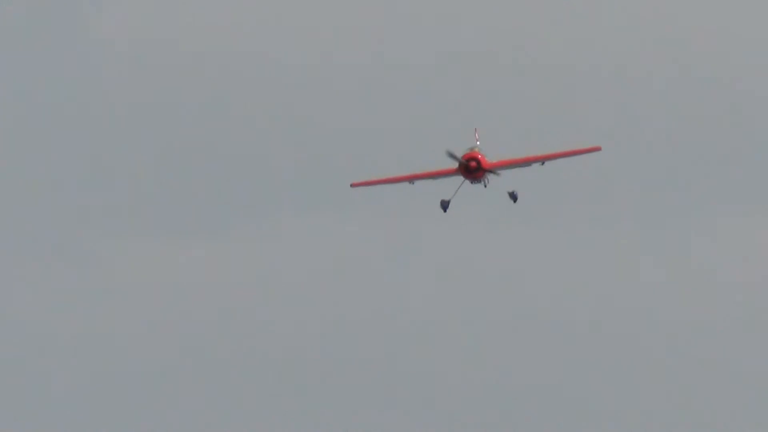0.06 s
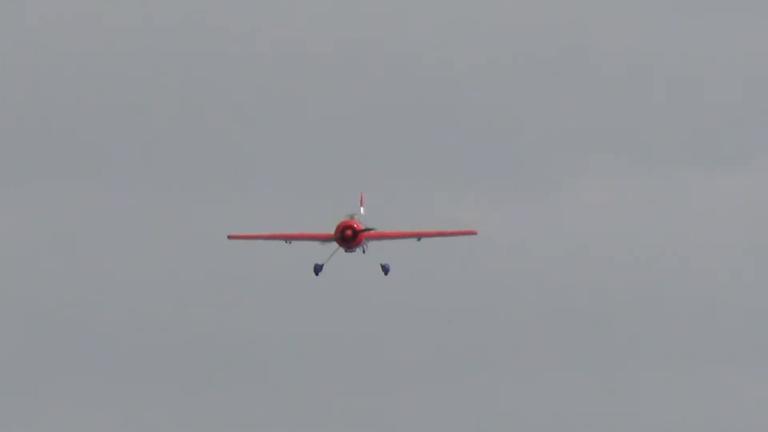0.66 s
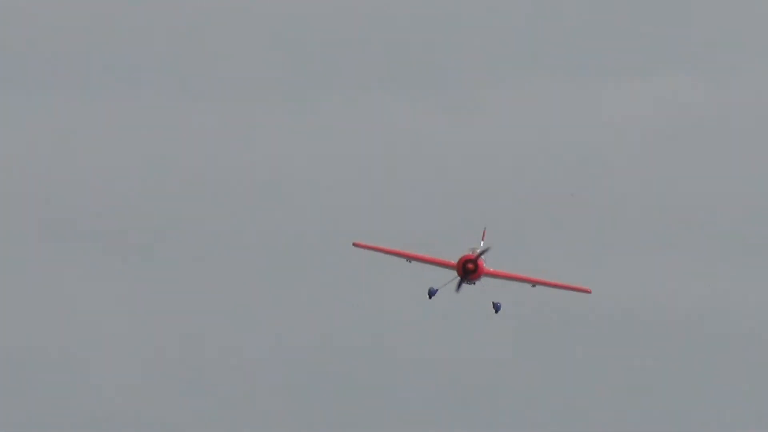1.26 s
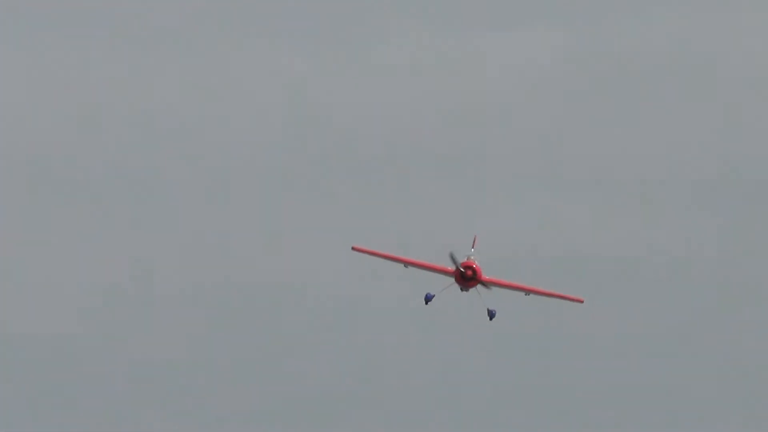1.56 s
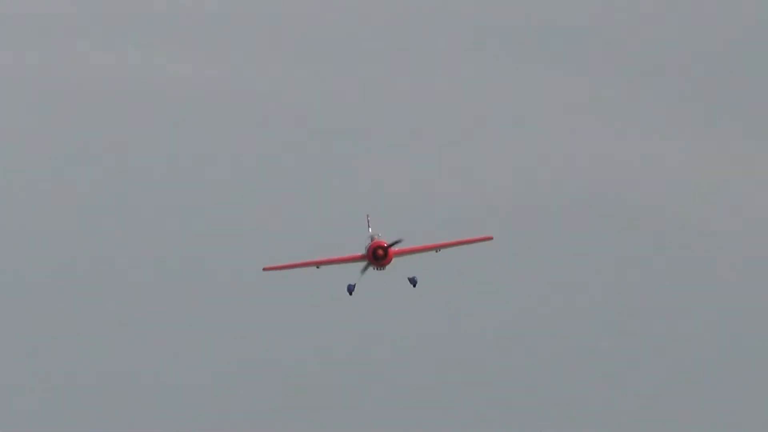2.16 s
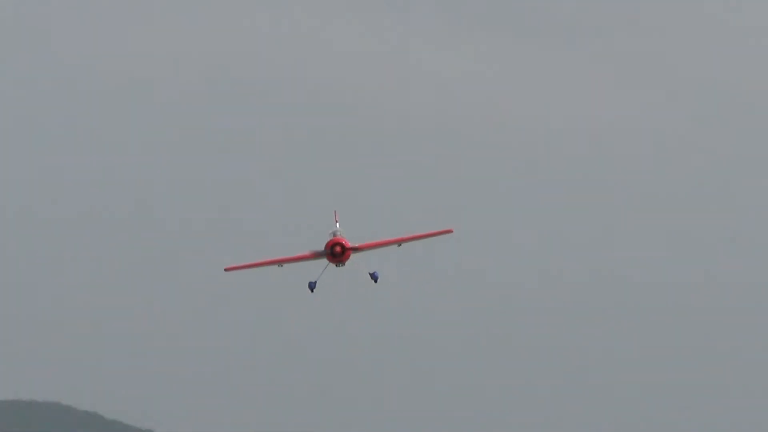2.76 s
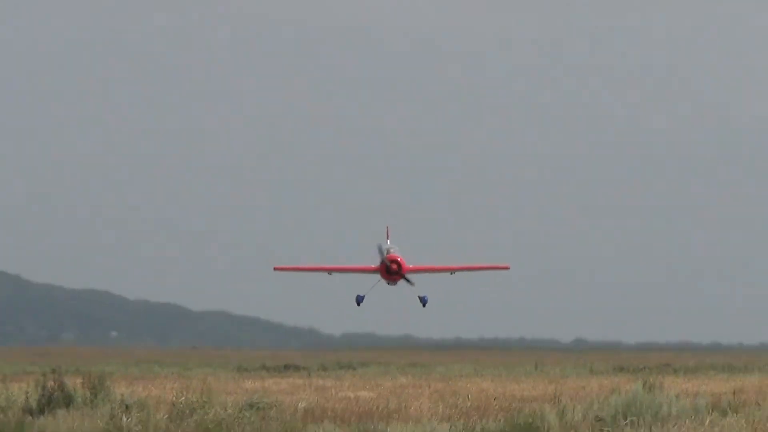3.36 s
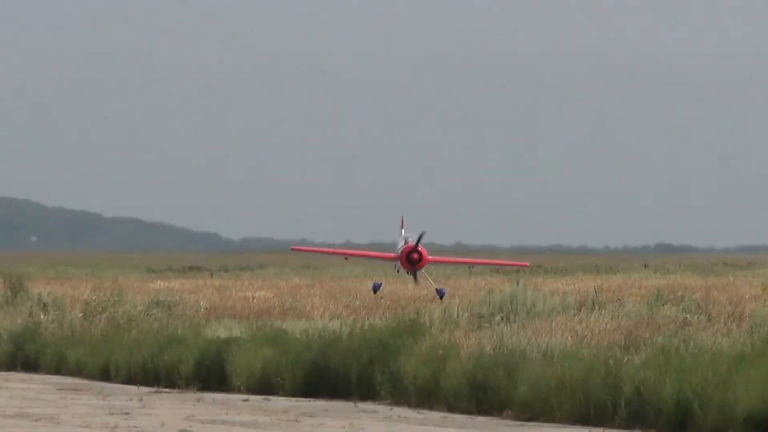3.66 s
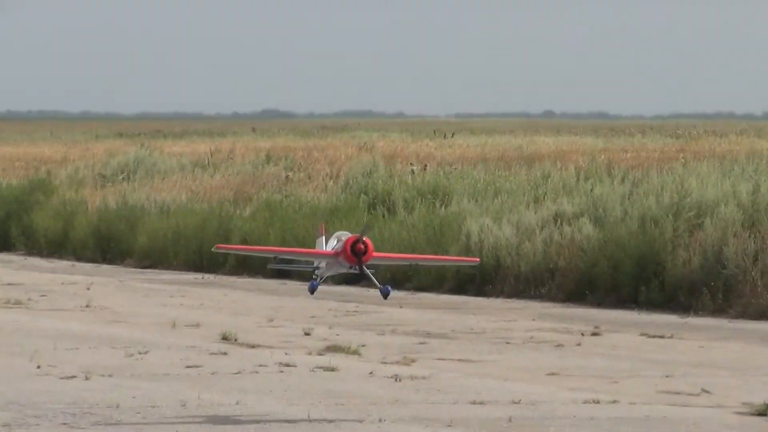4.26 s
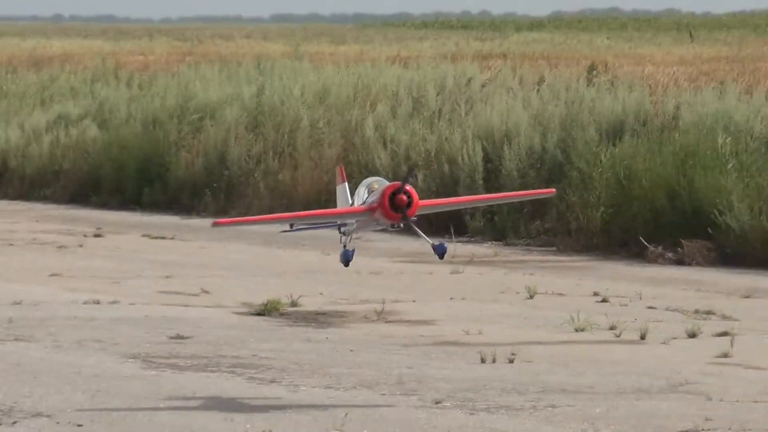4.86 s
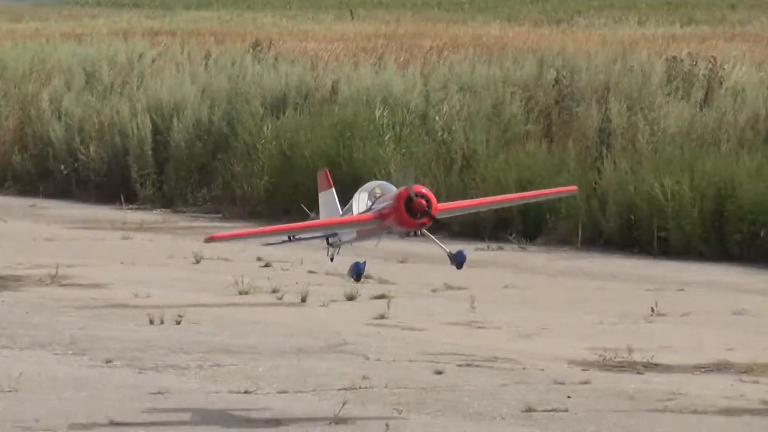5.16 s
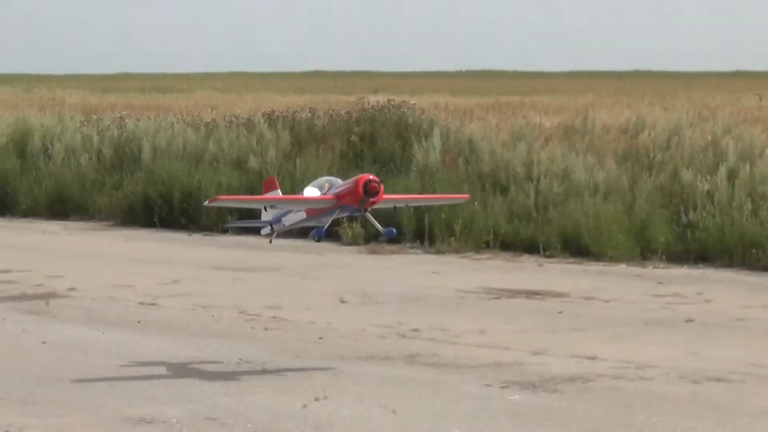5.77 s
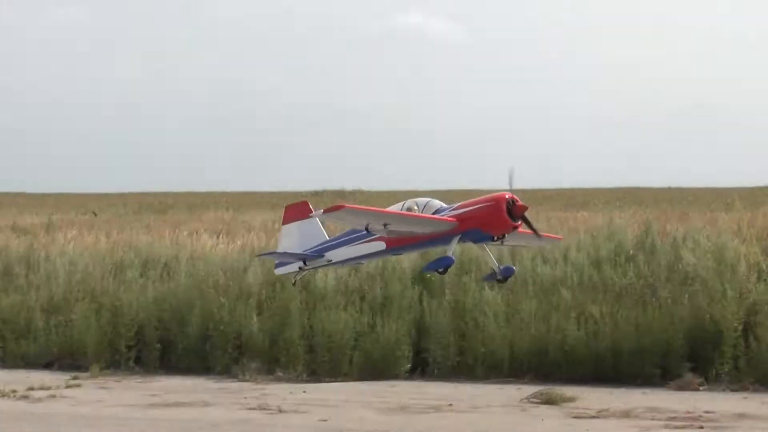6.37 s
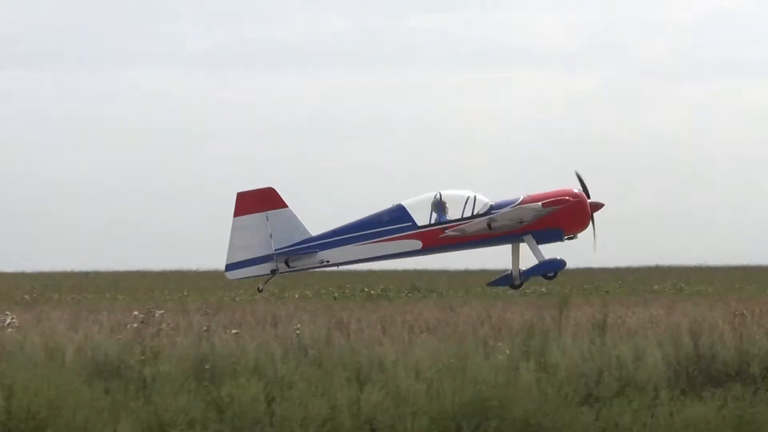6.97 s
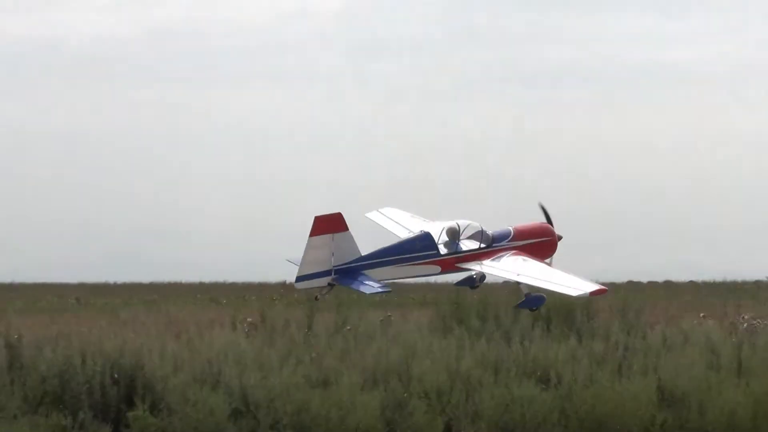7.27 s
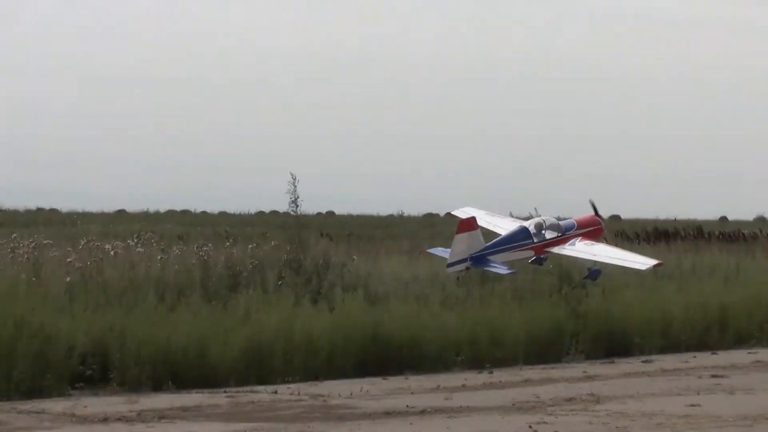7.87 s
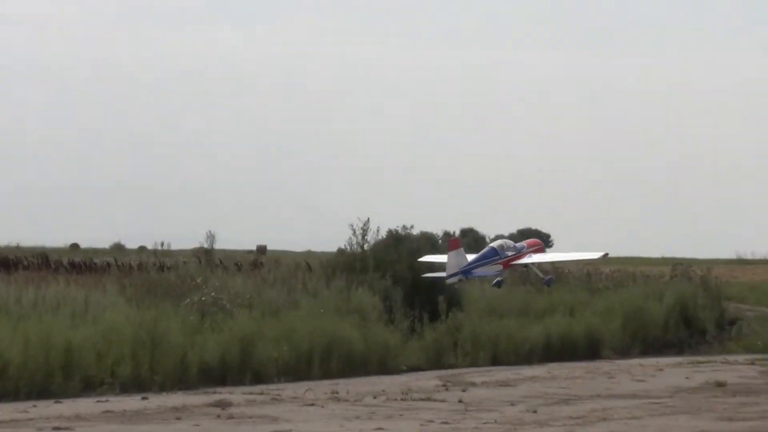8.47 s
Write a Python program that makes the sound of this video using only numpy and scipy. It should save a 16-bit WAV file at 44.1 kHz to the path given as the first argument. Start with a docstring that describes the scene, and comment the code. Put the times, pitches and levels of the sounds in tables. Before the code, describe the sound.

Outdoors in an open field, a small model plane approaches with a sputtering, irregular putter and a swishing propeller. The engine gets fuller and louder and makes a low pass near the microphone, with a phasing sweep in its tone. Just after, two brief gusts buffet the microphone as the engine revs up, rising in pitch to a hard, even buzz while heading away.

```python
"""A far-off two-stroke sputters at idle while light wind bumps the microphone: a model aeroplane
glides in, passes low over a runway and opens up again. Each turn of the shaft blows a pulse through
the silencer, which booms, rings and barks; at idle it often fires only every second turn.
The propeller hisses and the piston rattles. The ground returns a late copy that sweeps a comb
through the sound, and a gain control ducks the loudest peaks."""
import sys
import numpy as np
from scipy import signal
from scipy.fft import rfft, irfft, next_fast_len
from scipy.io import wavfile
from scipy.ndimage import uniform_filter1d

SR = 44100
rng = np.random.default_rng(int(sys.argv[2]) if len(sys.argv) > 2 else 0)


def dump(signal):
    """Clip the signal to [-1, 1] and save it as 16-bit WAV at the path in sys.argv[1]."""
    limited = np.clip(np.atleast_2d(signal).T, -1, 1)
    pcm = np.round(limited * 32767).astype(np.int16)
    wavfile.write(sys.argv[1], SR, pcm)


N = 380141
TIME = np.arange(N) / SR

# noise colours: f/Hz, relative level/dB
FIELD_COLOUR = [(25, -31), (60, -42), (110, -8), (200, -4), (400, -0.5), (1000, 3), (1800, -2.5),
                (3000, -7.5), (6000, -12), (12000, -26), (16000, -18)]
BUFFET_COLOUR = [(25, -61), (70, -28), (130, -8.5), (210, -4), (330, -8), (500, -10.5), (900, -42),
                 (2500, -67)]
PROPELLER_COLOUR = [(100, -45), (200, -9), (330, -3), (550, 2), (1000, .5), (2000, -4), (3000, -7.5),
                    (4500, -8.5), (5800, -7), (6900, -4), (7900, 1.5), (9000, -3.5), (11000, -13),
                    (13000, -26), (16000, -30)]
GAS_COLOUR = [(700, -40), (1500, -4), (2200, -1), (3050, -9), (4000, 3), (4900, 1.5), (5800, -6),
              (7900, 8.5), (10000, -3), (13000, -12), (16000, -31)]
# the strongest eddies on the microphone: t/s, buffet/dB, rumble/dB, bell half-width/s
EDDIES = [(0.163, -51.5, -64, 0.06), (0.492, -54, -63, 0.021), (0.635, -52, -72, .015),
          (0.766, -48, -70, 0.017), (0.864, -41.5, -72, 0.015), (0.972, -49, -77, 0.021),
          (1.031, -36.5, -70, 0.0096), (1.18, -45, -70, 0.029), (1.632, -49, -62, 0.0075),
          (4.19, -45, -58, 0.027), (7.46, -18, -45, 0.041), (7.905, -4.5, -65.5, 0.013)]
# tone of the left microphone against the right: f/Hz, level/dB
LEFT_TILT = [(30, 0), (70, -2), (150, -2.9), (260, -2.9), (380, -1.6), (520, -.1), (1500, -.3), (4000, .2),
             (16000, 0)]
# phase lead of the left microphone: f/Hz, phase/rad
LEFT_LEAD = [(0, 0), (15700, 0.095)]
# ground echo: t/s, effective height/m (sets its delay and sweeping comb), nominal reflected share
GROUND_BOUNCE = [(0, 1.3, .5), (.5, 1.55, .6), (.9, 1.95, 0.5), (1.2, 2.7, 0.25), (2.6, 2.05, 0.46),
                 (3.5, 0.63, 0.068), (4.4, 0.25, 0.5), (4.9, 0.37, 0.45), (5.45, 0.74, 0.6),
                 (5.75, .9, 0.6), (5.9, .99, .65), (6.17, 1.31, 0.8), (6.5, 1.64, 0.75),
                 (6.88, 1.685, 0.75), (7.2, 1.66, .75), (7.45, 1.5, 0.75), (7.7, 1.37, .62),
                 (8.05, 1.29, 0.62), (8.62, 1.36, 0.55)]
# treble rides on hiss and rattle: t/s, 2.4-5 kHz gain/dB, 5-7.2 kHz gain/dB, gain above 7.2 kHz/dB
TREBLE_RIDES = [(0, 14, -19, -3), (.2, 13, -5, 0), (.45, 7, -2, 4.5), (.8, -7, 7, 1), (1.05, 10, 2, -9),
                (1.25, 10.5, 9, 0), (1.5, 6.5, -6, -9), (1.7, 7, -8, -3), (1.85, 8, -10, -8),
                (2.1, 7.5, 3.5, -3), (2.8, 1.5, -5.5, -10), (3.1, 8, 2.5, -8.5), (3.33, 5.5, -13, -4),
                (3.48, -5, -38, -10), (3.7, -2, -2.5, -10.5), (4.4, 2, -4, -9.5), (5.2, 3, 2.5, 1.5)]
# tone by direction: angle off the nose/deg, boom/dB, bark/dB, cowl/dB, propeller hiss/dB
DIRECTIVITY = [(5.96, -10, -8, -2.5, -9), (8.6, -21.5, -10.5, -3, -1), (12.1, -12.5, -7.5, -8.5, 3),
               (12.4, -14, -3, -9.5, 6), (18.3, -13, -1.5, -12, 2), (24.3, -8.5, -5.5, -16.5, -1),
               (37.2, -8, -3.5, -12, 2.5), (54.5, -5, -4.5, -17, 4.5), (82.5, -0.5, -3.5, -52, -0.5),
               (128, -1, -2.5, -24.5, 3.5), (154.6, 0.5, -1.5, -10, 2.5), (161, -2, -0.5, -13, -14)]
# shaft turns per second as heard: t/s, f/Hz
SHAFT_SPEED = [(0.0, 54.64), (0.3, 54.51), (0.6, 53.6), (0.85, 54.65), (1.05, 52.18), (1.3, 52.7),
               (1.84, 51.7), (2.12, 46.92), (2.63, 51.73), (2.85, 51.18), (3.32, 50.33), (3.64, 51.95),
               (3.9, 46.51), (4.16, 50.84), (4.34, 46.64), (4.82, 49.83), (4.97, 59.77), (5.16, 50.72),
               (5.38, 61.77), (5.62, 57.95), (5.8, 58.09), (6.02, 58.29), (6.3, 60.49), (6.5, 56.81),
               (6.7, 57.34), (6.95, 54.36), (7.28, 55.07), (7.5, 57.84), (7.77, 72.16), (7.92, 74.6),
               (8.17, 78.66), (8.3, 85.46), (8.62, 96.23)]
# misfires on alternate turns, lone or in runs: start t/s, count, strength against a full firing/dB
MISFIRE_RUNS = [(.011, 3, -24), (.157, 2, -18), (.249, 2, -18), (.47, 1, -27), (.525, 1, -13),
                (.637, 1, -18), (.785, 1, -24), (.84, 4, -1), (1.256, 2, -10), (1.37, 2, -15),
                (1.484, 1, -15), (1.541, 1, -14), (1.677, 4, -18), (1.869, 2, -9), (2.219, 1, -24),
                (2.281, 1, -11), (2.405, 2, -17), (2.523, 6, -23), (2.913, 1, -3), (3.032, 1, -5),
                (3.07, 1, -27), (3.288, 4, -22), (3.525, 6, -35), (3.969, 7, -29), (4.336, 3, -8),
                (4.527, 9, -27), (4.96, 4, -6), (5.235, 8, -19), (5.523, 15, -38), (6.156, 4, -17),
                (6.324, 1, -8), (6.357, 3, -22), (6.458, 3, -34), (6.6, 12, -18.5), (7.029, 12, -21),
                (7.46, 2, -7)]
# accents on single firings: t/s, bark trim/dB, level trim/dB
POP_ACCENTS = [(.067, 4, 0.5), (.176, 3, 1), (.452, 9.5, 3), (.62, 5, 0), (.768, 11, 3.5), (.823, 9, 3.5),
               (1.2, 6, 4.5), (1.522, 6, 1), (1.657, 7, 1.5), (1.695, 5, 1.5), (1.733, 6, 3),
               (1.888, 1, 4.5), (2.198, 7, 0.5), (2.302, 0, 1), (2.543, 9.5, -3), (2.582, 8.5, -2),
               (3.658, -7, 5.5), (3.697, 0, 6), (4.111, -0.5, -1.5), (4.151, -1, 3.5), (5.011, -0.5, 0),
               (5.047, -6, 6), (5.122, -1.5, 7.5), (5.141, 3.5, 5), (6.407, -2.5, 2.5), (6.565, 3, 1.5),
               (7.228, -1.5, 1.5), (7.263, 1, 1.5)]
# resonances of the engine's metal casing: f/Hz, width/Hz, relative level/dB
CASING_MODES = [(3647, 90, -9), (4960, 140, -9), (6450, 140, -8), (7380, 150, -3), (7935, 150, 0),
                (8550, 220, -3)]
# resonances of the cowl, and of its side: f/Hz, width/Hz, relative level/dB
COWL_MODES = [(1205, 135, 0)]
FLANK_MODES = [(858, 46, 1), (935, 43, 2)]
# resonances of silencer and exhaust, low to high: f/Hz, width/Hz, relative level/dB
IDLE_BOOM_MODES = [(223, 42, -4), (320, 93, 2.5), (362, 41, 2.5)]
OPEN_BOOM_MODES = [(257, 103, 18.4), (423, 113, 20.1)]
RING_MODES = [(541.6, 103, 13.5), (620, 106, 12)]
BARK_MODES = [(1690, 144, -0.5), (1970, 245, 3), (2320, 380, -5)]
RASP_MODES = [(2590, 200, 11), (3230, 440, 10.5), (3860, 310, 9)]
TIN_MODES = [(3620, 330, -1), (4140, 310, 1.5), (4800, 100, -2)]

BREEZE_DB, BREEZE_ENDS_S, EDDY_DB = -60.5, 2.17, 5.5  # weak random eddies until the breeze drops
PASSES_S, SPEED_M_S, NEAREST_M, MIC_HEIGHT_M = 6.88, 13.76, 9.01, 1.503
# far off, the wind bends the sound away over the microphone
SHADOW_FROM_M, SHADOW_FULL_M, SHADOW_DB, SHADOW_HISS_DB = 49, 85.5, -14.5, -4
TOP_LIFT_DB_PER_M, TOP_LIFT_FROM_M = 0.03, 6.8
GROUND_LEAD_RAD = 0.19  # porous ground turns the phase of a steep bounce
HUB_M, HISS_MIRROR = .07, 0.54  # the propeller sits above the silencer; its wide disc blurs its bounce
# base levels at the nearest point at idle, and their rise with shaft speed
IDLE_HZ, EXHAUST_DB, HISS_DB, RATTLE_DB = 58.3, -6.5, -18.5, -23.5
EXHAUST_DB_PER_HZ, HISS_DB_PER_HZ, RATTLE_DB_PER_HZ = 0.9425, 0.9786, 0.66
EFFORT_HZ_PER_S, PULL_DB, COAST_DB = 23.4, 4.5, -4
FLANK_DB, RASP_DB, TIN_DB = -11, -9, -4  # layer trims
BOOM_SAG = 0.35  # share of a misfire's drop in dB that the boom follows
HEAT_SCATTER, MISFIRE_COOLING = 0.015, 0.013  # shares by which resonances wander, and sink on a misfire
LIMIT_DB, RELEASE_DB_PER_S, CEILING, TOP_HZ = -5, 8.5, .8, 15850


def amp(db):
    """Decibels to gain."""
    return 10 ** (np.asarray(db) / 20)


def curves(table, at):
    """A table's other columns, interpolated along its first."""
    axis, *columns = np.transpose(table)
    return [np.interp(at, axis, column) for column in columns]


def on_log_axis(points, hz):
    """A frequency curve read at hz, on a log axis."""
    f, values = np.transpose(points)
    return np.interp(np.log(hz + 1), np.log(f), values)


def noise(colour):
    """Noise of a given colour, rms 1."""
    size = next_fast_len(N)
    gain = amp(on_log_axis(colour, np.fft.rfftfreq(size, 1 / SR)))
    y = irfft(rfft(rng.standard_normal(size)) * gain, size)[:N]
    return y / y.std()


def drift(rate_hz):
    """A smooth random modulator, spread 1."""
    hold = int(SR / rate_hz)
    steps = np.repeat(rng.standard_normal(N // hold + 1), hold)
    y = uniform_filter1d(uniform_filter1d(steps, hold), hold)[:N]
    return y / y.std()


def resonate(x, modes, band_hz, order=2):
    """Damped modes between soft band edges; a unit click comes out with unit energy."""
    t = np.arange(2048) / SR
    ring = sum(amp(db) * np.sqrt(width) * np.exp(-np.pi * width * t) * np.cos(2 * np.pi * hz * t)
               for hz, width, db in modes)
    ring = signal.sosfilt(signal.butter(order, band_hz, "band", fs=SR, output="sos"), ring)
    return signal.oaconvolve(x, ring / np.linalg.norm(ring))[:N]


def clicks(times, sizes):
    """Clicks shared between neighbouring samples."""
    at = np.clip(times * SR, 0, N - 2)
    i = at.astype(int)
    return np.bincount(i, sizes * (1 - at + i), N) + np.bincount(i + 1, sizes * (at - i), N)


def puffs(times, sizes, rise_s, fall_s):
    """A quick attack and decay after each time, with peak 1 for size 1."""
    t = np.arange(2048) / SR
    shape = (1 - np.exp(-t / rise_s)) * np.exp(-t / fall_s)
    return signal.oaconvolve(clicks(times, sizes), shape / shape.max())[:N]


def gain_control(x):
    """Ducks fast for a peak over the limit and releases slowly."""
    over_db = 20 * np.log10(abs(x).max(axis=0) + 1e-9) - LIMIT_DB
    recovery = RELEASE_DB_PER_S * TIME
    cut_db = np.maximum(np.maximum.accumulate(over_db + recovery) - recovery, 0)
    return x * amp(-uniform_filter1d(cut_db, size=256))


def wind():
    """The bed: short eddies buffet the microphone ports over the soft rustle of the field."""
    swells = np.array([np.exp(-.5 * ((TIME - s) / width) ** 2) for s, _, _, width in EDDIES])
    _, buffet_db, thump_db, _ = np.transpose(EDDIES)
    fade = np.clip((BREEZE_ENDS_S - TIME) / 0.48, 0, 1)
    breeze = amp(BREEZE_DB + EDDY_DB * np.tanh(drift(30.8))) * fade
    ports = noise(BUFFET_COLOUR) + 0.24 * np.array([noise(BUFFET_COLOUR), noise(BUFFET_COLOUR)])
    field = noise(FIELD_COLOUR) + 0.21 * np.array([noise(FIELD_COLOUR), noise(FIELD_COLOUR)])
    # the deepest rumble is unrelated left and right, and grows while the microphones swing round
    rumble = np.array([noise([(25, -32), (70, 8), (130, 8), (400, -58)]) for _ in range(2)])
    rumble_db = np.interp(TIME, [3, 5.5, 7.3, 8.6], [-72, -76, -49, -61])
    buffet = (amp(buffet_db) @ swells + breeze) * ports
    return buffet + amp(-51) * field + (amp(rumble_db) + amp(thump_db) @ swells) * rumble


def flight(t):
    """A straight, steady pass: distance in m, degrees off the nose, depth in the wind shadow (0-1)."""
    ahead = SPEED_M_S * (PASSES_S - t)
    metres = np.hypot(ahead, NEAREST_M)
    shadow = np.clip((metres - SHADOW_FROM_M) / (SHADOW_FULL_M - SHADOW_FROM_M), 0, 1)
    return metres, np.degrees(np.arctan2(NEAREST_M, ahead)), shadow


def grass_scatter(x):
    """Tall grass scatters a faint, very short tail."""
    t = np.arange(SR // 4) / SR
    tail = rng.standard_normal(len(t)) * np.exp(-t / 0.0049) * (t > .004)
    tail = signal.sosfilt(signal.butter(1, [500, 3500], "band", fs=SR, output="sos"), tail)
    return amp(-25) * signal.oaconvolve(x, tail / np.linalg.norm(tail))[:N]


def over_ground(x, lift_m, near_bounce=1):
    """Direct sound plus its late bounce make a sweeping comb; near_bounce scales it at close range."""
    metres = flight(TIME)[0]
    effective_height_m, share = curves(GROUND_BOUNCE, TIME)
    delay_ms = 1000 * 2 * MIC_HEIGHT_M * (effective_height_m + lift_m) / metres / 343
    steep = np.clip(delay_ms / 0.4, 0, 1)
    # rough ground mirrors treble only at grazing angles
    dull_mix = np.clip(delay_ms / .6, 0, 1)
    dull = signal.sosfiltfilt(signal.butter(3, 5800, fs=SR, output="sos"), x)
    dull = np.real(signal.hilbert(dull, next_fast_len(N))[:N] * np.exp(1j * GROUND_LEAD_RAD))
    # tufts and hollows make the bounce flutter
    delay_ms = delay_ms * (1 + .012 * drift(20))
    closeness = np.clip(2 - metres / 35, 0, 1)
    share = share * amp(steep * drift(10)) * (1 + (near_bounce - 1) * closeness)
    bounce = np.interp(TIME - delay_ms / 1000, TIME, dull_mix * dull + (1 - dull_mix) * x)
    combed = (x + share * bounce) / (1 + 0.086 * share * (1 - steep))
    return combed + grass_scatter(combed)


def top_lift(x):
    """A gentle high shelf: the top octave gains a little with distance."""
    below = signal.sosfiltfilt(signal.butter(2, 9500, fs=SR, output="sos"), x)
    return below + (x - below) * amp(TOP_LIFT_DB_PER_M * (flight(TIME)[0] - TOP_LIFT_FROM_M))


def swish(x):
    """The hiss swishes: three treble bands swell and fade on set curves, with slight flutter far off."""
    far = np.clip((5.5 - TIME) / 3, 0, 1)
    out = 0
    for edge_hz, db in zip((2440, 5000, 7200, None), [0] + curves(TREBLE_RIDES, TIME)):
        band = signal.sosfiltfilt(signal.butter(5, edge_hz, fs=SR, output="sos"), x) if edge_hz else x
        out = out + band * amp(db + .9 * far * drift(8))
        x = x - band
    return out


def shaft():
    """The engine's clock: the shaft angle in turns, and the moments when the exhaust port opens."""
    turns = 5 / 12 + np.cumsum(curves(SHAFT_SPEED, TIME)[0]) / SR
    return turns, np.interp(np.arange(1, int(turns[-1]) + 1), turns, TIME)


def piston_rattle(times, scatter_db=2):
    """The piston knocks at both ends of its stroke, never twice alike, and rings the metal casing."""
    knocks = np.concatenate([times, (times[1:] + times[:-1]) / 2]) + .001
    metres, _, shadow = flight(knocks)
    over_idle_hz = curves(SHAFT_SPEED, knocks)[0] - IDLE_HZ
    db = RATTLE_DB + RATTLE_DB_PER_HZ * over_idle_hz + SHADOW_HISS_DB * shadow
    out = 0
    for hz, width, mode_db in CASING_MODES:
        sizes = amp(db + mode_db + scatter_db * rng.standard_normal(len(knocks))) * NEAREST_M / metres
        out = out + resonate(clicks(knocks, sizes), [(hz, width, 0)], (2500, 11000))
    return out


def propeller(turns):
    """Turbulence hisses off two blades, rising with speed and pulsing as each swings towards us."""
    metres, degrees, shadow = flight(TIME)
    revs_db = HISS_DB_PER_HZ * (curves(SHAFT_SPEED, TIME)[0] - IDLE_HZ)
    hiss_db = HISS_DB + curves(DIRECTIVITY, degrees)[3] + revs_db + SHADOW_HISS_DB * shadow
    blades = 1 + 0.28 * np.cos(4 * np.pi * turns - 1.2) + 0.24 * np.cos(2 * np.pi * turns - .6)
    return amp(hiss_db + drift(45)) * NEAREST_M / metres * blades * noise(PROPELLER_COLOUR)


def misfires(times):
    """The sputter, in dB per turn: an unscavenged cylinder skips every second firing, or just one."""
    db = np.zeros(len(times))
    for start, count, depth_db in MISFIRE_RUNS:
        first = np.argmin(abs(times - start))
        last = first + 2 * count
        db[first - 1:last] = 0
        db[first:last:2] = depth_db
    return db


def engine_drive(times, hz):
    """Punch in dB per turn: it rises with revs; near idle, pulling hardens it and coasting softens it."""
    effort = np.gradient(curves(SHAFT_SPEED, times + 0.022)[0], times) / EFFORT_HZ_PER_S
    effort_db = np.interp(effort, [-1, 0, 1], [COAST_DB, 0, PULL_DB])
    near_idle = np.clip((61 - hz) / 7, 0, 1)
    return EXHAUST_DB + EXHAUST_DB_PER_HZ * (hz - IDLE_HZ) + effort_db * near_idle


def heat_detune(x, times, shift):
    """The gas is never twice equally hot: each turn's ring bends by its shift, then gets back in step."""
    turn = np.interp(TIME, times, np.arange(len(times)))
    k = turn.astype(int)
    ahead_s = (shift * np.gradient(times))[k] * np.sin(np.pi * (turn - k)) / np.pi
    return np.interp(TIME + ahead_s, TIME, x)


def gas_spit(times, db, metres):
    """Escaping gas spits a bright puff of noise on each turn, a little softer from far off."""
    sizes = amp(db - np.interp(metres, [24, 40, 60], [0, 3.5, 1.5]))
    return puffs(times + 0.00018, sizes, rise_s=0.0021, fall_s=0.0024) * noise(GAS_COLOUR)


def misfire_hoot(times, size, burn_db, degrees):
    """Unburnt charge is pushed out late and hoots in the silencer; it is not heard nose on."""
    unburnt = size * np.clip((degrees - 15) / 25, 0, 1) * (1 - amp(burn_db))
    return resonate(clicks(times + 0.00075, -unburnt * amp(-2)), [(579, 89, 0)], (495, 770))


def exhaust(times):
    """Each blow-down rings the silencer; a misfire still pumps air, so it booms but hardly barks."""
    hz = curves(SHAFT_SPEED, times)[0]
    metres, degrees, shadow = flight(times)
    boom_db, bark_db, cowl_db, _ = curves(DIRECTIVITY, degrees)
    throttle = np.clip((hz - 57) / 16, 0, 1)
    side_on = np.clip((degrees - 24) / 32, 0, 1)  # 0 nose on, 1 from the side and beyond
    pop_bark_db, pop_db = sum(np.outer(trims, np.arange(len(times)) == np.argmin(abs(times - s)))
                              for s, *trims in POP_ACCENTS)
    level_db = engine_drive(times, hz) + 20 * np.log10(NEAREST_M / metres) + SHADOW_DB * shadow + pop_db
    time_dice, size_dice, boom_dice, crack_dice, gas_dice, heat_dice = rng.standard_normal((len(hz), 6)).T
    idling = 1 - throttle  # scales the scatter: under load the firings even out
    times = times + .00005 * idling * time_dice
    burn_db = misfires(times)
    size = amp(level_db + .7 * idling * size_dice) * np.sqrt(.005 * SR)

    def blow(db, rough, lag_s=0):
        """A pressure kick with a turbulent wake."""
        kick = size * amp(db)
        wake = puffs(times + lag_s, kick * (1 - .55 * throttle), rise_s=.0003, fall_s=.0016)
        return clicks(times + lag_s, -kick) + rough * wake * rng.standard_normal(N)

    # the body crossfades from the idle boom to the open one with the throttle
    opened = np.interp(TIME, times, throttle)
    boom_db = boom_db + BOOM_SAG * np.maximum(burn_db, -20)
    idle = resonate(blow(boom_db - 1 + boom_dice, rough=.035), IDLE_BOOM_MODES, (155, 700), order=4)
    loaded = resonate(blow(boom_db + 2 - 4 * idling, rough=.054), OPEN_BOOM_MODES, (178, 1330))
    boom = (1 - opened) * idle + opened * loaded
    ring = resonate(blow(-2 + 0.33 * burn_db - 2.5 * throttle, rough=.039), RING_MODES, (288, 1390))
    # the cowl answers late, with a nasal note
    cowl = resonate(blow(cowl_db + .5 * burn_db, rough=.012, lag_s=.00037), COWL_MODES, (850, 1900))
    # a cylinder flushed by a misfire holds a fresh charge, and the next firing cracks harder
    fresh = np.roll(burn_db < 0, 1) * (burn_db == 0)
    bite_db = bark_db - 7.5 + 4 * fresh + pop_bark_db + burn_db + 1.5 * throttle
    crack_db = bite_db + 2 * shadow + (idling + 3 * shadow) * crack_dice
    bark = resonate(blow(crack_db, rough=.02), BARK_MODES, (1350, 2400), order=3)
    tin_db = crack_db + TIN_DB - 8 * throttle - 2 * (1 - side_on)
    tin = resonate(blow(tin_db, rough=.036), TIN_MODES, (3260, 5660))
    # under load the pulse front steepens into a clean rasp
    rasp = opened * resonate(blow(RASP_DB + burn_db, rough=.01, lag_s=.0002), RASP_MODES, (2100, 4600))
    hoot = misfire_hoot(times, size, burn_db, degrees)
    honk_db = FLANK_DB + .5 * burn_db - 40 * (1 - side_on) + 2 * throttle
    honk = resonate(blow(honk_db, rough=.04), FLANK_MODES, (720, 1400))
    gas = gas_spit(times, level_db + bite_db + 1.5 * gas_dice, metres)
    heat = HEAT_SCATTER * idling * heat_dice - MISFIRE_COOLING * (burn_db < 0)
    return heat_detune(boom + ring + cowl + honk + bark + tin + rasp + hoot, times, heat) + gas


def scene():
    """The aeroplane stays centred over the wind bed; a little of its hiss adds width at the sides."""
    turns, times = shaft()
    engine = over_ground(top_lift(exhaust(times)), lift_m=0)
    nose = swish(propeller(turns) + piston_rattle(times))
    nose = over_ground(top_lift(nose), lift_m=HUB_M, near_bounce=HISS_MIRROR)
    side = amp(-25.5) * propeller(turns)
    return engine + nose + np.array([side, -side]) + wind()


def record(dry):
    """The bass leans a little right; the gain is ridden, the peaks are rounded and the top is cut."""
    size = next_fast_len(N)
    hz = np.fft.rfftfreq(size, 1 / SR)
    left = amp(on_log_axis(LEFT_TILT, hz) / 2) * np.exp(1j * on_log_axis(LEFT_LEAD, hz) / 2)
    heard = irfft(rfft(dry, size) * np.array([left, 1 / left]), size)[:, :N]
    rounded = CEILING * np.tanh(gain_control(heard) / CEILING)
    return signal.sosfilt(signal.ellip(10, .2, 80, TOP_HZ, fs=SR, output="sos"), rounded)


dry = scene()
out = record(dry)
dump(out)
```